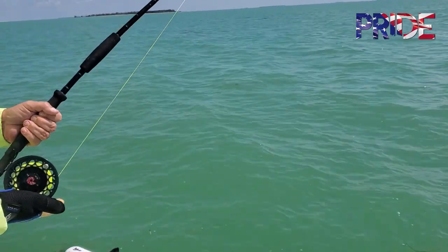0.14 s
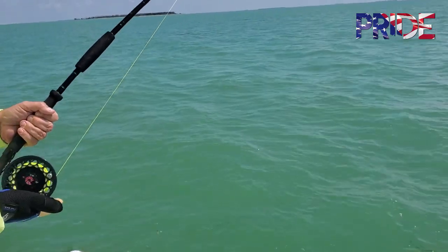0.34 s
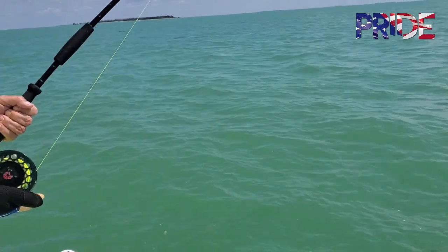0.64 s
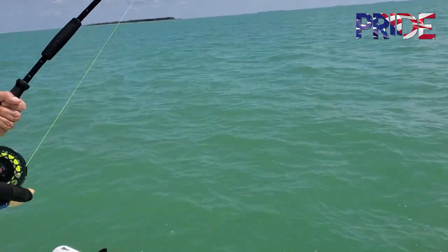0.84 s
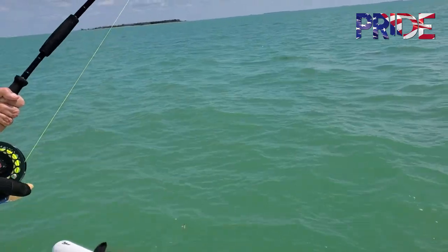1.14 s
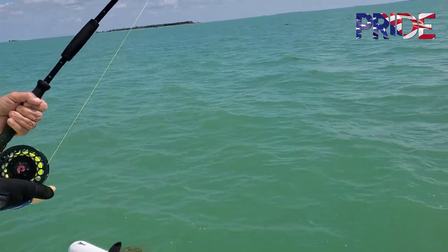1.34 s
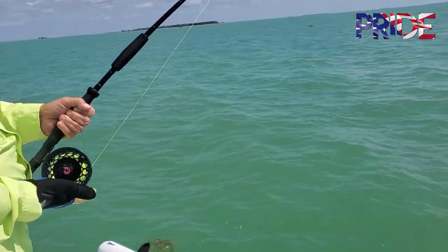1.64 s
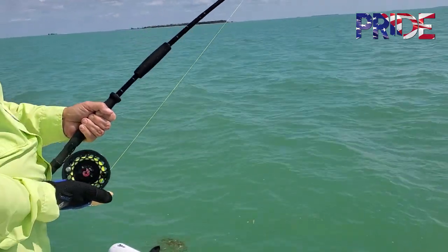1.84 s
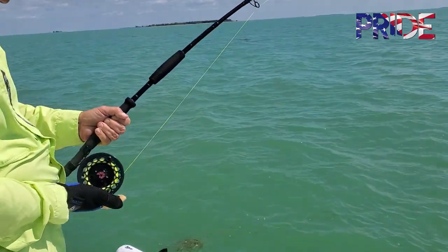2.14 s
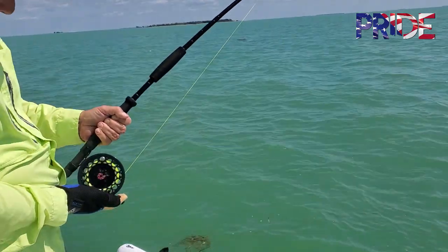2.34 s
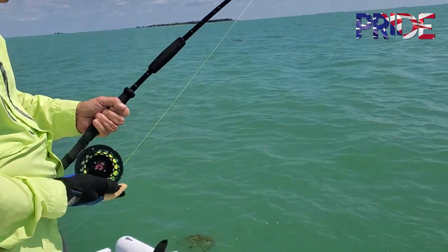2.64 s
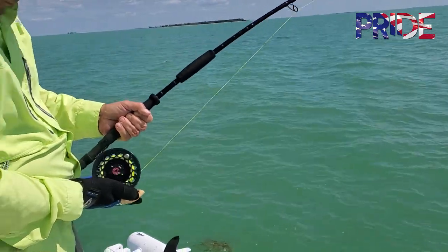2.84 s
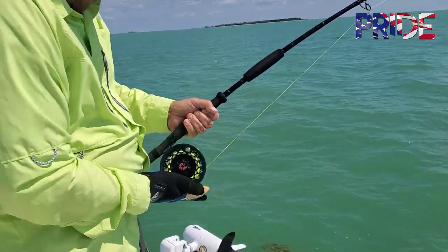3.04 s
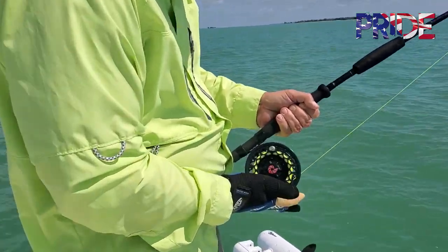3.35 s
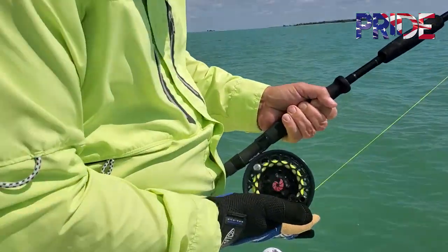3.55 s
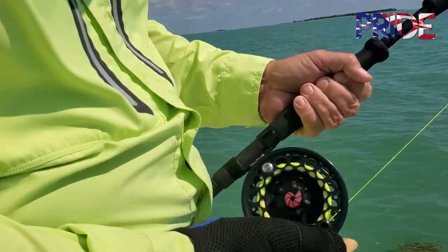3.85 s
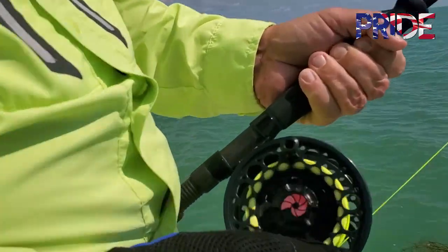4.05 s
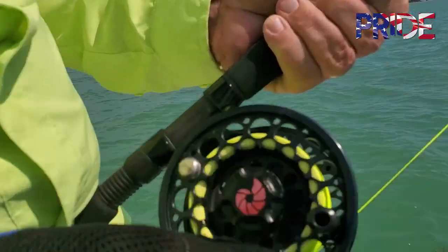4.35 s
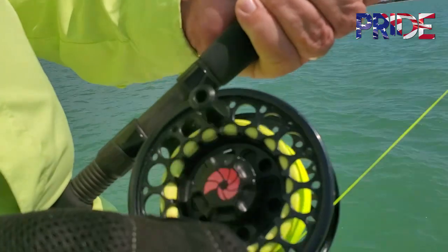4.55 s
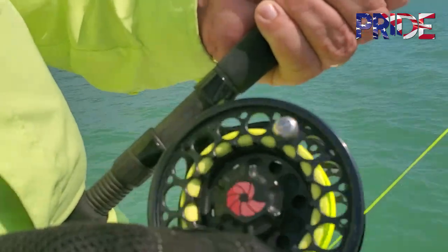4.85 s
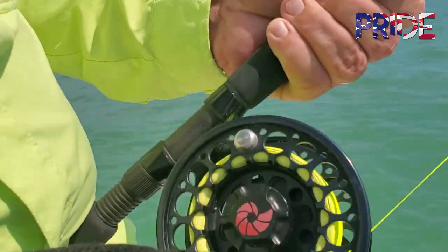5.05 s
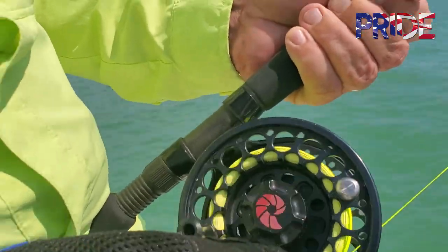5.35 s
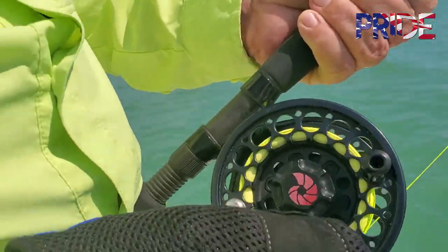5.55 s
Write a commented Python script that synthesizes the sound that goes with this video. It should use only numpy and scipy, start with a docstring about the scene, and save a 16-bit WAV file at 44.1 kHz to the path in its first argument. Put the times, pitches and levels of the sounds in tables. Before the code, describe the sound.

A hooked fish pulls line from a large clicking reel. Slow distant clatter speeds to a shrill buzz around two seconds, falls, and races again near three. Spool knocks ring as the listener closes in, then the clicking slows, halts for an instant and restarts. Small waves lap and slap the boat outdoors, with soft wind and distant wash; stereo, reel mainly on the right.

```python
"""A large fly reel on a boat, close on the right: a hooked fish strips line as the listener moves in.
The pawl ticks over the ratchet from a clatter to a buzz, shaped by the resonances of spool and frame.
The running line whines in step with the teeth; the spool knocks about once a turn and its frame rings.
Behind it small waves slap the hull, water laps, and a light breeze reaches the microphone over a far wash."""
import sys
import numpy as np
from scipy import signal
from scipy.fft import rfft, irfft
from scipy.io import wavfile
from scipy.ndimage import uniform_filter1d

SR = 44100
rng = np.random.default_rng(int(sys.argv[2]) if len(sys.argv) > 2 else 0)


def transcribe(signal):
    """Save signal, clipped to [-1, 1], as a 16-bit WAV file at the path in sys.argv[1]."""
    frames = np.atleast_2d(signal).T
    limited = np.clip(frames, -1, 1)
    pcm = np.round(limited * 32767).astype(np.int16)
    wavfile.write(sys.argv[1], SR, pcm)


N = 251370  # samples
T = np.arange(N) / SR  # s
HZ = np.fft.rfftfreq(4096, 1 / SR)

# far wash of the sea: (frequency [Hz], relative level [dB])
SEA_COLOUR = [(100, -20), (600, 8.5), (1200, 0.5), (3000, -4.5), (8000, -10), (16000, -60)]
SEA_DB = -63
# breeze on the microphone: (frequency [Hz], relative level [dB])
WIND_COLOUR = [(15, -38), (30, -12.5), (60, -2), (110, -4), (180, -11.5), (400, -43.5), (1500, -44.5)]
# its strength, before a common trim: (time [s], level [dB])
BREEZE_LEVEL = [(0, -52.5), (.85, -46), (1.35, -52), (1.6, -48.5), (2.4, -44), (3.1, -50), (3.8, -49.5),
                (4.4, -53.5), (5.7, -50.5)]
# water along the hull: (frequency [Hz], relative level [dB])
WATER_COLOUR = [(60, -22), (130, 3.5), (220, 4), (430, 0.5), (650, -13.5), (1000, -35), (2000, -22),
                (6000, -26.5)]
# lapping swells as the boat rolls, before a common trim: (time [s], level [dB])
LAPPING_LEVEL = [(0, -59.5), (.15, -42.5), (.35, -54), (1.35, -53.5), (1.7, -37), (2.05, -48),
                 (2.35, -40.5), (2.7, -47), (3.8, -47.5), (4.05, -57.5), (5.33, -61.5), (5.48, -39.5),
                 (5.6, -57)]
# larger waves slapping the hull: (time [s], peak before trim [dB], central pitch [Hz], length [s])
HULL_SLAPS = [(.128, -30, 773, .055), (0.417, -37, 760, 0.016), (0.449, -36.5, 202.5, 0.018),
              (0.871, -31.5, 162, 0.036), (1.528, -27.5, 163, 0.031), (1.703, -27, 241, .04),
              (1.708, -25.5, 558, 0.02), (2.39, -26.5, 205, 0.039), (2.939, -33.5, 253, .03),
              (3.84, -26, 380, .015), (4.365, -39, 517, 0.026), (5.084, -37.5, 156, 0.035),
              (5.461, -29, 554, 0.023)]

# ring of the frame after a knock: (nominal frequency [Hz], relative level [dB], t60 [s])
FRAME_MODES = [(1547, -4, 0.088), (2287, 10, 0.13), (2645, -1, 0.12), (4030, 11.5, 0.028),
               (4700, -19, 0.048), (5980, 17, 0.031)]
# change of colour in a hard knock: (frequency [Hz], change [dB])
HARD_COLOUR = [(500, 4), (1400, 8), (2300, 5.5), (3500, 9.5), (6000, 7), (8000, 0.5), (9200, 4.5),
               (10400, 4), (11500, 0.5), (13300, 3), (15000, 11.5)]
# hard knocks of the spool: (time [s], level over 10 ms before trim [dB], length [s])
HARD_KNOCKS = [(.177, -39.5, 0.0034), (.645, -40, 0.0027), (1.64, -38, 0.0028), (1.718, -29.5, 0.0065),
               (1.794, -24.5, 0.01), (1.857, -24, 0.0032), (2.522, -29.5, 0.0074), (2.607, -30, .003),
               (2.87, -24.5, 0.048), (2.946, -15.5, 0.0056), (3.004, -26.5, 0.0023), (3.068, -26, 0.003),
               (3.137, -25, 0.011), (3.233, -33, 0.0029), (3.362, -33, .005), (3.469, -27, 0.0093),
               (3.548, -23.5, 0.0086), (3.631, -27.5, 0.0076), (3.723, -25, 0.009), (3.84, -24.5, 0.015),
               (3.982, -29, 0.0082), (4.117, -19.5, 0.0042), (4.22, -21, 0.0082), (4.328, -20, .015),
               (4.466, -17.5, 0.0057), (4.654, -22.5, 0.0077), (4.858, -24, 0.039), (5.043, -23.5, 0.004),
               (5.415, -16.5, 0.013), (5.525, -23.5, 0.01), (5.545, -19.5, 0.00086)]
# soft knocks: level against the ratchet, its scatter, length
TEETH_PER_TURN, SOFT_DB, SOFT_SCATTER_DB, SOFT_S = 40, -4, -3, 0.016
# the ring is RING_DB after a usual knock and follows only part of a change in force
RING_DB, RING_FOLLOWS, USUAL_KNOCK_DB = -39, 0.83, -26
RING_BEHIND_DB = 2.5  # the angler's body shades the clatter more than the ring

# how the rod radiates the whine: (frequency [Hz], relative level [dB])
ROD_COLOUR = [(500, -11), (1300, -14.5), (1800, -7.5), (2150, 0), (2400, 2), (2900, -6), (3700, 1.5),
              (4500, -3.5), (6000, -6.5), (8000, -26), (14000, -20)]
# the line bites into a guide and the whine clears to a squeal: (time [s], bell sigma [s], gain [dB])
GUIDE_SQUEALS = [(1.27, 0.038, 9), (1.78, 0.072, 13), (2.03, .06, 10), (2.382, 0.18, 13), (4.232, 0.076, 8),
                 (4.366, 0.022, 12), (4.616, 0.034, 11.5), (4.823, 0.021, 11.5), (5.46, 0.02, 13)]
WHINE_PER_TOOTH = 6.3  # cycles of the whine's lowest partial
# level against the pawl at 300 teeth a second, and its gain for each doubling of speed
WHINE_DB, WHINE_DB_PER_OCTAVE = -7.5, 6

# broad colour of a click: (frequency [Hz], left ear [relative dB], right ear [relative dB])
REEL_COLOUR = [(146, -9, -109), (420, -7.5, -18), (890, -7.5, -12), (1540, -6, -10), (2490, 3, 3.5),
               (3140, 1, -16), (4580, 1.5, -3), (4640, -3.5, -6), (7180, 14, 7.5), (7950, 15, 7),
               (9600, 6.5, -3), (11540, -53, -2), (12030, 13, -0.5), (15400, -22.5, -3.5)]
# resonances of spool and frame: (frequency [Hz], width [Hz], left ear [dB], right ear [dB])
SPOOL_MODES = [(2247, 143, 6.5, 2.5), (3452, 540, -5.5, 11.5), (8033, 800, -29, 12),
               (9880, 430, 12.5, 16.5), (10710, 520, -36, 13.5), (11420, 890, -15, 18.5),
               (12480, 170, -16, 12), (14340, 180, 26.5, -28)]
# change of colour when heard from behind the angler: (frequency [Hz], change [dB])
BEHIND_COLOUR = [(900, -12), (2300, -3.5), (3500, 16), (5000, 10), (6300, 9), (7000, 0.5), (8000, -4.5),
                 (10000, -9), (11500, 7), (15000, 15)]
# distance of the listener: (time [s], nearness to the reel [0-1])
REEL_NEARNESS = [(0, 0), (1.5, 0.02), (2.6, 0.04), (3.3, 0.33), (4.1, 0.85), (5.7, 0.94)]
LEFT_EAR_DB = -10.5  # the reel faces the right ear

# the fish runs in surges, rests once and runs again: (time [s], speed before inertia [teeth/s])
SPOOL_SPEED = [(.02, 0), (.13, 180), (.36, 185), (.51, 130), (.61, 175), (.72, 122.5), (.87, 180),
               (.99, 85), (1.3, 240), (1.46, 65), (1.68, 529.5), (1.82, 570), (1.92, 725), (2.03, 575),
               (2.22, 900), (2.3, 984), (2.42, 825), (2.58, 540), (2.62, 310), (2.76, 178), (2.88, 518),
               (2.96, 635), (3.09, 592), (3.2, 391), (3.32, 263), (3.54, 515.5), (3.65, 464), (3.8, 317),
               (3.99, 260.5), (4.12, 360.5), (4.21, 381.5), (4.35, 335), (4.56, 200), (4.72, 176),
               (5.08, 235.5), (5.18, 70), (5.2, -0.5), (5.32, 1), (5.335, 108.5), (5.38, 234),
               (5.45, 349.5), (5.61, 167), (5.7, 206.5)]
INERTIA_S = .02  # the spool's mass rounds off every change of speed
# the pawl grows louder as the listener closes in: (time [s], level at 100 teeth/s before trim [dB])
PAWL_LEVEL = [(0, -44), (1, -48.5), (1.6, -46), (2.55, -44.5), (2.75, -47), (2.92, -47), (3.25, -46),
              (3.42, -42.5), (3.8, -40), (4.14, -32), (4.6, -34), (5.5, -32), (5.7, -35.5)]
# pawl rubbing on the teeth: (frequency [Hz], relative level [dB])
RUB_COLOUR = [(500, 6.5), (2000, 13), (4000, 10.5), (6500, 9.5), (9000, -3.5), (12500, 3), (15000, -28)]
EDGE_HZ = 15850  # treble limit of the recorder


def amp(db):
    """Decibels to gain."""
    return 10 ** (np.asarray(db) / 20)


def unit(x):
    """Scaled to an rms of 1."""
    return x / np.sqrt(np.mean(x ** 2) + 1e-20)


def curve(rows, t=T):
    """Each column of a time table at the times t."""
    s, *columns = np.transpose(rows)
    return [np.interp(t, s, c) for c in columns]


def read(rows, hz=HZ):
    """Each column of a spectrum table at the frequencies hz."""
    f, *columns = np.transpose(rows)
    return np.array([np.interp(np.log(hz + 1), np.log(f), c) for c in columns])


def add(mix, s, sound):
    """Mixes a sound in at s seconds."""
    part = mix[:, max(round(s * SR), 0):][:, :sound.shape[-1]]
    part += sound[..., :part.shape[-1]]


def wander(hz):
    """Smooth random movement of rms 1, up to about hz."""
    lowpass = np.exp(-(np.fft.rfftfreq(N, 1 / SR) / hz) ** 2)
    return unit(irfft(rfft(rng.standard_normal(N)) * lowpass, N))


def noise(spectrum, shared):
    """A pair of coloured noises with a common part."""
    z = rng.standard_normal((3, N))
    shared = np.clip(shared, 0, 1)
    pair = np.sqrt(shared) * z[-1] + np.sqrt(1 - shared) * z[:2]
    gain = amp(read(spectrum, np.fft.rfftfreq(N, 1 / SR)))
    return unit(irfft(rfft(pair) * gain, N))


def pulses(times, sizes):
    """Band-limited impulses at exact times."""
    out, at = np.zeros(N), times[:, None] * SR
    index = at.astype(int) + np.arange(-7, 9)
    shape = np.sinc(index - at) * np.sinc((index - at) / 8)
    np.add.at(out, np.clip(index, 0, N - 1), sizes[:, None] * shape)
    return out


def water(lap_db=0.5, churn_db=4.0, wind_db=3.5, gust_db=4.0):
    """Coloured noises that swell and flutter: lapping on the hull, breeze on the microphone, far wash."""
    churning = unit(noise(WATER_COLOUR, shared=0.2) * amp(churn_db * wander(21.7)))
    lapping = churning * amp(curve(LAPPING_LEVEL)[0] + lap_db)
    gusting = unit(noise(WIND_COLOUR, shared=0.021) * amp(gust_db * wander(18.7)))
    breeze = gusting * amp(curve(BREEZE_LEVEL)[0] + wind_db)
    sea = amp(SEA_DB) * noise(SEA_COLOUR, shared=0.24)
    return lapping + breeze + sea


def slaps(level_db=-4, spread=0.252, decay_cycles=4, rise=0.019, gush_per_s=22, count=10):
    """Each wave gushes against the hull and traps air pockets that ring briefly and rise in pitch."""
    out, t = np.zeros((2, N)), np.arange(12000) / SR
    for s, db, hz, length in HULL_SLAPS:
        pockets = np.zeros((2, len(t)))
        for k in range(count):
            late = k / count
            detune, side = rng.standard_normal(2)
            # a short slap keeps nearly one pitch
            pitch = hz * np.exp(spread * detune * np.sqrt(late * length / 0.024))
            age = pitch * t / decay_cycles
            tone = np.sin(2 * np.pi * pitch * t * (1 + rise * np.tanh(age / 2)))
            pocket = tone * np.exp(-age) * (1 - np.exp(-8 * age))
            add(pockets, 1.5 * length * late, amp([[2 * side], [-2 * side]]) * np.exp(-late) * pocket)
        band = signal.butter(3, [hz / 2.6, hz * 1.32], "band", fs=SR, output="sos")
        spray = rng.standard_normal((2, len(t))) + rng.standard_normal(len(t))  # own + common to both ears
        wash = signal.sosfilt(band, spray * np.exp(-(t / length) ** 2 / 2))
        splash = unit(pockets) + gush_per_s * length * unit(wash)
        add(out, s, amp(db + level_db) * splash / abs(splash.mean(0)).max())
    return out


def reflections(x, share=0.54, sway=0.1432):
    """Echoes off glove, sleeve and rod shift as the angler moves, so the ringing bands waver."""
    out = x
    for delay_s in (.0005, .0011, .0019):
        echo = [np.interp(T - delay_s * (1 + sway * wander(3.61)), T, ear) for ear in x]
        out = out + share * np.array(echo)
    return out / np.sqrt(1 + 3 * share ** 2)


def strike(train, snap_s, ring_s, ring, loose):
    """A snap builds and scatters through the spool: partly alike on every tooth, partly a fresh scrape."""
    t = np.arange(512) / SR
    swell = (t / snap_s) ** 2
    shape = swell * np.exp(2 - 2 * t / snap_s) + ring * np.tanh(swell) * np.exp(-t / ring_s)
    shape /= np.linalg.norm(shape)
    path = shape * rng.standard_normal((2, len(t)))
    for _ in range(16):  # even out the colour while keeping the snap short
        path = irfft(np.exp(1j * np.angle(rfft(path))))
        path *= shape / np.sqrt(abs(uniform_filter1d(path ** 2, size=15, axis=1)) + 1e-12)
    alike = signal.oaconvolve(train[None], path, axes=1)[:, :N]
    envelope = np.sqrt(abs(signal.oaconvolve(train ** 2, shape ** 2)[:N]))
    fresh = envelope * rng.standard_normal((2, N))
    loose = np.clip(loose, 0, 1)
    return np.sqrt(1 - loose) * alike + np.sqrt(loose) * fresh


def body(x, colour_db):
    """The reel's resonances as a causal filter; a unit click carries 10 ms of unit power in the treble."""
    db = read(REEL_COLOUR) + colour_db
    for hz, width, *ears_db in SPOOL_MODES:
        db = db + np.array(ears_db)[:, None] / (1 + (2 * (HZ - hz) / width) ** 2)
    treble = (HZ > 5000) & (HZ < 15000)
    power = np.mean(amp(db) ** 2 * treble, axis=1, keepdims=True)
    gain = amp(db) / np.sqrt(power * 100 / SR)
    # minimum phase: the ring follows the click, never precedes it
    log_gain = np.log(np.hstack([gain, gain[:, -2:0:-1]]))
    response = np.fft.ifft(np.exp(np.conj(signal.hilbert(log_gain)))).real
    return signal.oaconvolve(x, response, axes=1)[:, :N]


def soft_knocks(speed):
    """About one soft knock a turn between the hard ones, following the ratchet's level: same columns."""
    turns = np.cumsum(speed + 1e-6) / SR / TEETH_PER_TURN
    hard = np.interp([row[0] for row in HARD_KNOCKS], T, turns)
    gaps = [np.linspace(a, b, round(b - a) + 1)[1:-1] for a, b in zip(hard, hard[1:])]
    times = np.interp(np.concatenate(gaps), turns, T)
    speed_db = 10 * np.log10(np.interp(times, T, speed) / 100 + 1e-6)
    ratchet_db = curve(PAWL_LEVEL, times)[0] + speed_db
    return [(s, db + SOFT_DB + SOFT_SCATTER_DB * rng.standard_normal(), SOFT_S)
            for s, db in zip(times, ratchet_db)]


def frame_ring(t, length):
    """The frame's modes start at random phases, build over the knock's length and die away."""
    detune = 1 + 0.017 * rng.standard_normal()  # the grip changes from knock to knock
    ring = np.zeros((2, len(t)))
    for hz, db, t60 in FRAME_MODES:
        phase = rng.random() + 0.4 * rng.random((2, 1))  # in turns, slightly apart at the ears
        ring += amp(db - 60 * t / t60) * np.sin(2 * np.pi * (hz * detune * t + phase))
    ring *= 1 - np.exp(-2 * t / length)
    return ring * np.sqrt(0.011 * SR / np.sum(ring[0] ** 2))


def knocks(speed, uneven_db=5.0, level_db=1, fade=0.53, build=0.77, rattle=0.83):
    """The spool lurches: the pawl hits harder for a few teeth and the frame rings."""
    times, sizes, ringing, t = [], [], np.zeros((2, N)), np.arange(4096) / SR
    chatter = 1 + rattle * wander(81)  # the loose spool roughens the ring
    for s, db, length in HARD_KNOCKS + soft_knocks(speed):
        after = np.arange(-3, 16) / max(np.interp(s, T, speed), 60)  # s, one hit a tooth
        rising = np.minimum(after, 0) / (build * length)
        falling = fade * (np.maximum(after, 0) / length) ** 1.34
        size = np.exp(rising - falling) * amp(uneven_db * rng.standard_normal(len(after)))
        times.append(s + after)
        sizes.append(amp(db) * size / np.linalg.norm(size))
        behind_db = RING_BEHIND_DB * (1 - curve(REEL_NEARNESS, s)[0])
        frame_db = RING_DB + RING_FOLLOWS * (db - USUAL_KNOCK_DB) + behind_db
        add(ringing, s, amp(frame_db) * frame_ring(t, length))
    train = pulses(np.concatenate(times), np.concatenate(sizes))
    drive = strike(train, snap_s=0.000364, ring_s=0.0054, ring=0.42, loose=1.0)
    return amp(level_db) * body(drive, read(HARD_COLOUR)), ringing * unit(chatter)


def whine(speed, fall_db=-6, left_db=-3, right_db=-1, rasp=2.6, flutter_db=3):
    """Line rubbing through the guides sings a grainy note that follows speed, coloured by the rod."""
    hz = WHINE_PER_TOOTH * speed + 1
    turns = np.cumsum(hz) / SR
    fast = np.clip(speed / 600, 0, 1)  # a fast line rasps, a slow one sings
    pace = speed / 300 + 1e-6
    squeal = amp(sum(db * np.exp(-((T - s) / sigma) ** 2 / 2) for s, sigma, db in GUIDE_SQUEALS))
    ears = np.zeros((2, N))
    for k in range(1, 4):
        # overtones fade as the line speeds up
        gain = amp(read(ROD_COLOUR, k * hz)[0] + fall_db * pace ** 2 * np.log2(k))
        core = wander(45) + 1j * wander(45)
        fuzz = wander(260) + 1j * wander(260)
        both_fuzz = np.array([fuzz, np.roll(fuzz, N // 2)])  # unlike at the two ears
        grain = squeal - 1 + core + rasp * fast * both_fuzz
        ears += gain * (grain * np.exp(2j * np.pi * k * turns)).real / 2
    speed_db = WHINE_DB_PER_OCTAVE * np.log2(pace)
    level_db = curve(PAWL_LEVEL)[0] + WHINE_DB + speed_db + flutter_db * wander(22)
    return amp([[left_db], [right_db]]) * ears * amp(level_db)


def ratchet(speed, uneven_db=1.53, jitter=0.0094, rub_db=-7, level_db=-1, smooth_above=1000, ring=0.27,
            skip_speed=1300):
    """The pawl rubs up each tooth, ever harder, then drops off; at speed it skims and clicks differ more."""
    teeth = np.cumsum(speed + 1e-6) / SR
    times = np.interp(np.arange(1, teeth[-1]), teeth, T)
    chance = rng.standard_normal((len(times), 2))
    period = 1 / np.maximum(np.interp(times, T, speed), 60)
    train = pulses(times + jitter * period * chance[:, 0], amp(uneven_db * chance[:, 1]))
    loose = 1 / 10 + (speed / skip_speed) ** 2  # share of fresh scrape
    clicks = strike(train, snap_s=.00055, ring_s=0.00157, ring=ring, loose=loose)
    rubbing = amp(rub_db) * np.sqrt(speed / SR / (1 + (speed / smooth_above) ** 2))
    rub = rubbing * (.5 + teeth % 1) * noise(RUB_COLOUR, shared=0.23)
    drive = reflections(clicks + rub) * amp(curve(PAWL_LEVEL)[0] + level_db + wander(35))
    near = np.clip(curve(REEL_NEARNESS)[0], 0, 1)
    beside = body(drive * np.sqrt(near), 0)
    behind = body(drive * np.sqrt(1 - near), read(BEHIND_COLOUR))
    return beside + behind


def scene():
    """The spool's speed drives ratchet, knocks and whine; the water lies around them."""
    speed = np.maximum(uniform_filter1d(curve(SPOOL_SPEED)[0], round(INERTIA_S * SR)), 0)
    background = water() + slaps()
    clatter, ringing = knocks(speed)
    facing_right = amp([[LEFT_EAR_DB], [0]])
    reel = facing_right * (ratchet(speed) + clatter) + ringing + whine(speed)
    return background + reel


def record(dry):
    """The recorder's treble limit, a steep low-pass filter."""
    lowpass = signal.firwin(401, EDGE_HZ, window=("kaiser", 8), fs=SR)
    return signal.oaconvolve(dry, lowpass[None], "same")


dry = scene()
out = record(dry)
transcribe(out)
```